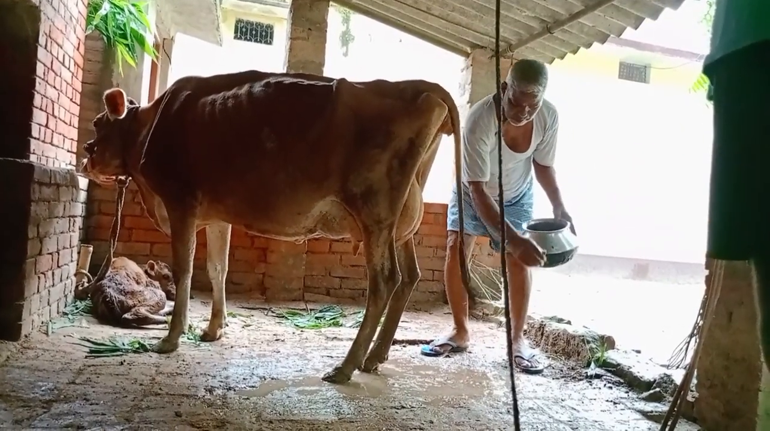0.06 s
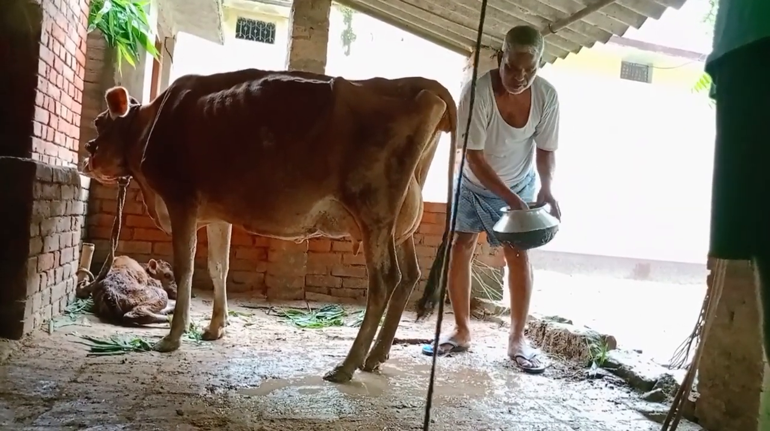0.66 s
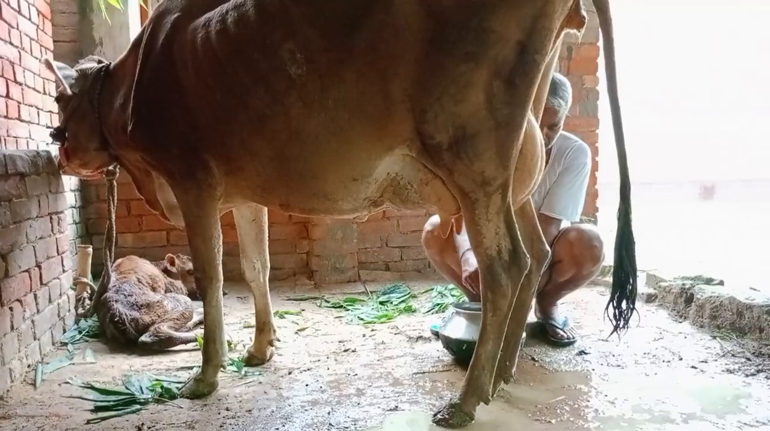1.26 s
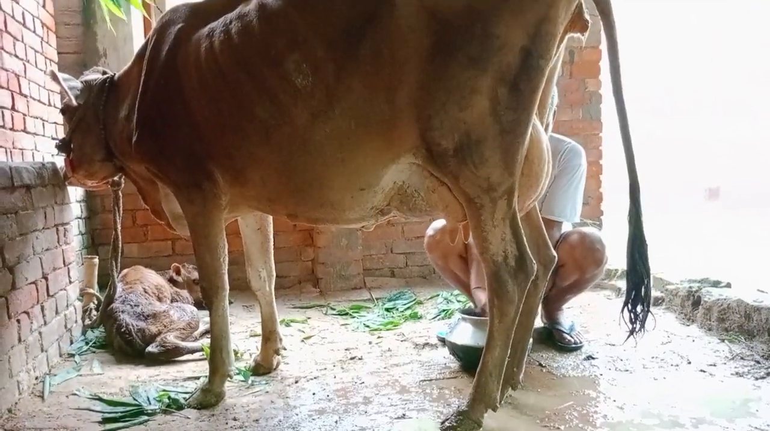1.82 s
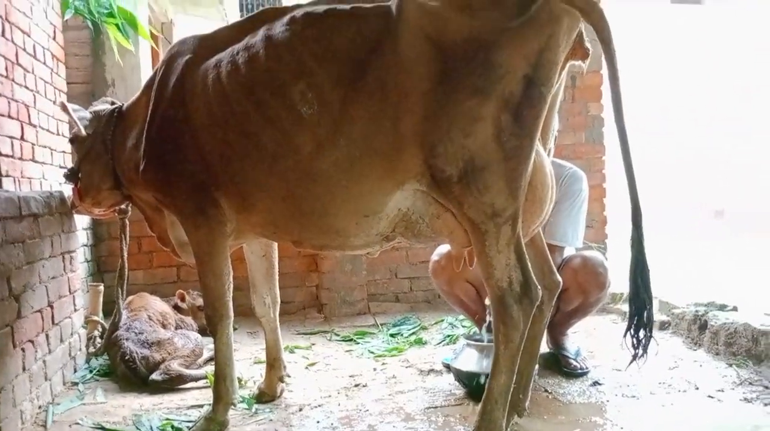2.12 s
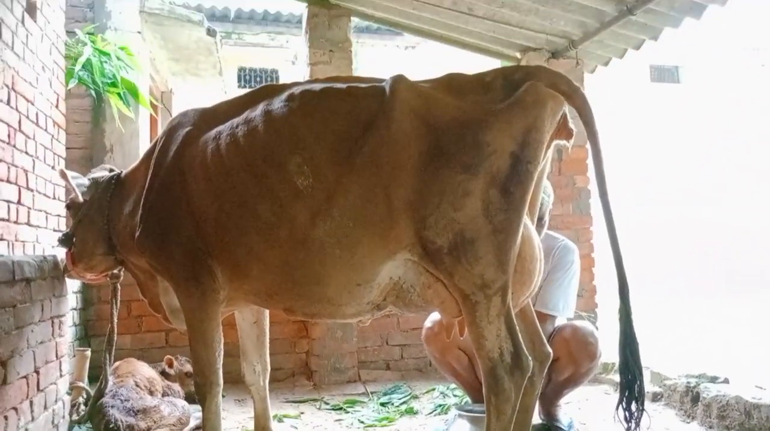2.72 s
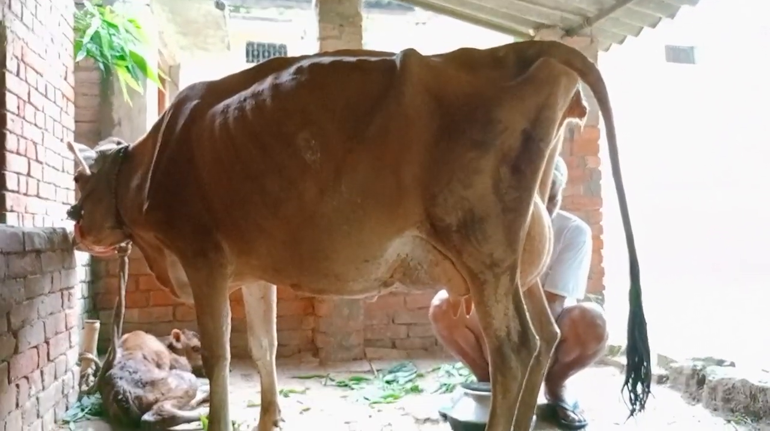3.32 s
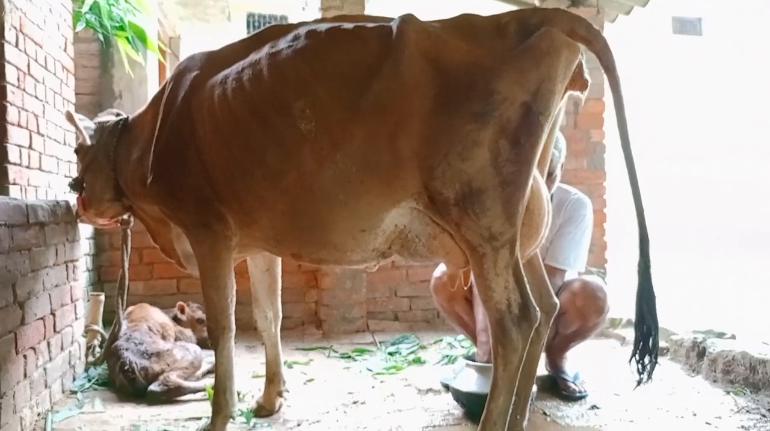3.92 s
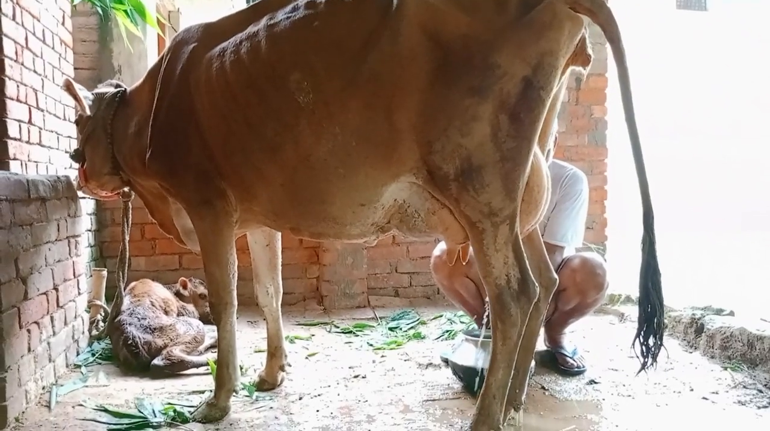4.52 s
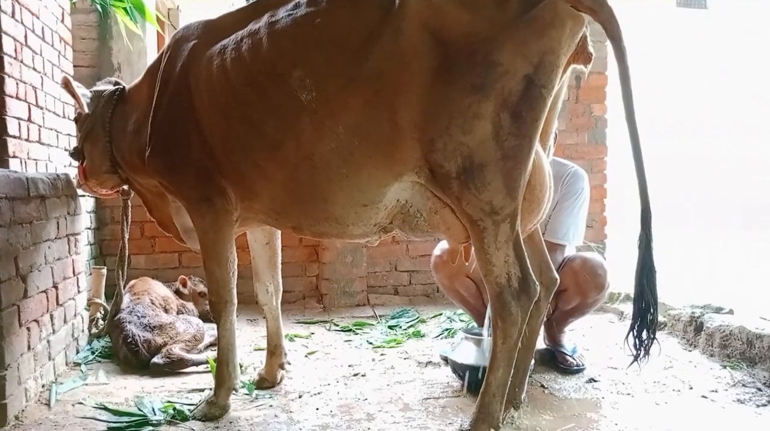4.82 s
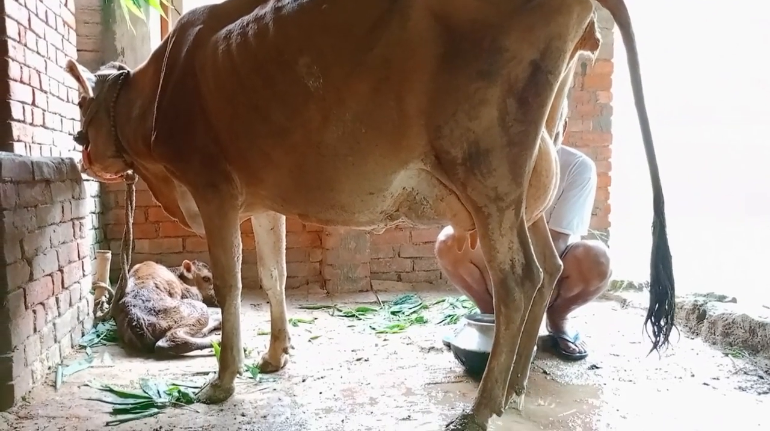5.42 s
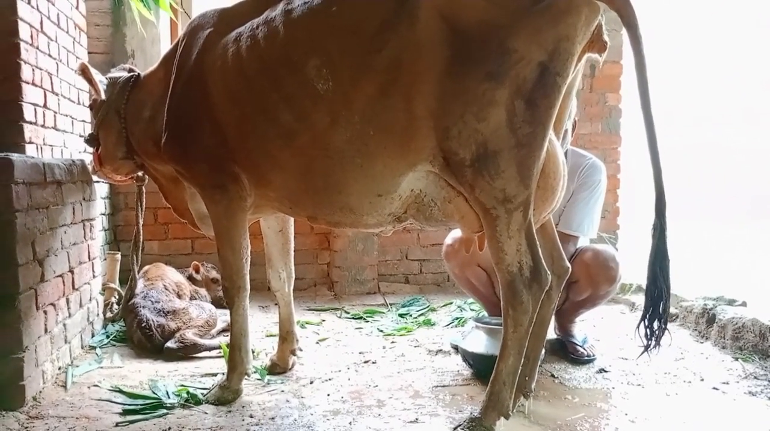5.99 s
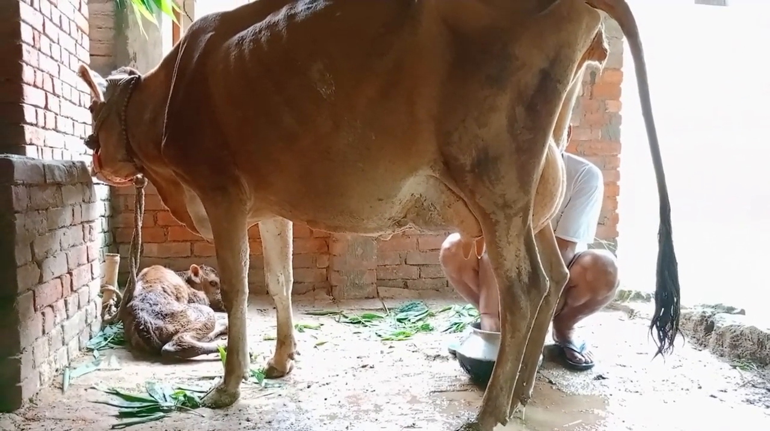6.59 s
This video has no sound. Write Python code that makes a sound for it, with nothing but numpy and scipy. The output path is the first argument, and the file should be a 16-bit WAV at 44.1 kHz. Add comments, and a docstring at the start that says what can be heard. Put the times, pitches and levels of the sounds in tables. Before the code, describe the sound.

In an open cowshed, short, uneven squirts of milk splash into a metal pot, with dribbles, ticking drips and a few sharp smacks of fat drops. A hoarse crow caw opens the scene and another comes near the end, as the milking grows sparser. Early on, everything drops to silence for under a second. Distant birds and a low rumble sit behind, heard through a slightly dull microphone.

```python
"""Over a low outdoor rumble a crow is already cawing, hoarse pulses ringing its throat; other birds
chirp and hoot far off. Within a second, hand milking of a cow starts in an open brick shed: short jets
spurt and splash into liquid, among drips, dribbles and a few soft knocks. At 1.2 s all sound drops out
for three quarters of a second. The milking carries on, some jets now ringing a metal pot and a few
fat drops smacking down. At 5 s the crow caws again, and the spurts thin out."""
import sys
import numpy as np
from scipy import signal
from scipy.fft import rfft, irfft, next_fast_len
from scipy.io import wavfile
from scipy.ndimage import map_coordinates

SR = 44100
rng = np.random.default_rng(int(sys.argv[2]) if len(sys.argv) > 2 else 0)


def master(y):
    """Save y as 16-bit WAV."""
    cut = np.clip(np.atleast_2d(y).T, -1, 1)
    pcm = np.round(cut * 32767)  # scale
    wavfile.write(sys.argv[1], SR, pcm.astype(np.int16))


N = 293385


def amp(db):
    return 10 ** (np.asarray(db) / 20)


def unit_rms(x):
    return x / np.sqrt(np.mean(x ** 2) + 1e-20)


def clock():
    return np.arange(N) / SR


def along(points, hz):
    """Read (Hz, value) points on a log frequency axis."""
    knots_hz, values = np.transpose(points)
    return np.interp(np.log(hz + 1), np.log(knots_hz + 1), values)


def fader(points):
    """A gain for every sample, from (seconds, dB) points."""
    return amp(np.interp(clock(), *np.transpose(points)))


def wobble(rate):
    """A smooth random curve, rate knots a second."""
    return map_coordinates(rng.standard_normal(int(N * rate / SR) + 4), [np.arange(N) * rate / SR])


def wavering_tone(hz, drift_hz, rate):
    """A sine whose pitch wanders at random around hz."""
    return np.sin(2 * np.pi * np.cumsum(hz + drift_hz * wobble(rate)) / SR)


def coloured(x, spectrum):
    """EQ x with a curve of (Hz, dB) points."""
    size = next_fast_len(len(x) + 8192)
    gain = amp(along(spectrum, np.fft.rfftfreq(size, 1 / SR)))
    return irfft(rfft(x, size) * gain, size)[:len(x)]


def resonate(x, hz, width_hz, order=2):
    """Ring x through a band-pass resonance."""
    edges = np.clip([hz - width_hz / 2, hz + width_hz / 2], 20, SR / 2 - 100)
    return signal.sosfilt(signal.butter(order, edges, "bandpass", fs=SR, output="sos"), x)


def add(track, start, x):
    """Mix x into the track from start seconds on."""
    part = track[max(round(start * SR), 0):][:len(x)]
    part += x[:len(part)]


def at_level(x, length, db):
    """Give x the energy of a sound held at db for length seconds."""
    return amp(db) * x * np.sqrt(length * SR / (np.sum(x ** 2) + 1e-20))


# Fader rides for the rumble and the hiss. Each row: time in seconds, level in dB.
RUMBLE_RIDE = [(0, -60.5), (2, -56.5), (5.2, -58), (5.5, -54.5), (6.65, -54)]
HISS_RIDE = [(0, -89), (1.2, -82), (1.97, -67.5), (6.65, -58.5)]
# Tone of the rumble and the airy hush. Each row: frequency in Hz, relative spectral level in dB.
RUMBLE_EQ = [(20, -51.5), (30, -20), (50, -14), (70, -3.5), (90, -4), (130, -1.5), (200, -2), (300, -10),
             (500, -28), (1500, -55.5)]
AIR_EQ = [(60, -32.5), (350, 5), (700, 2), (1500, 0.5), (2500, -3), (4000, -7.5), (5000, -9.5),
          (5700, -5.5), (7000, -8.5), (9000, -10), (16000, -11.5)]


def outdoors(air_db=-56, drone_db=-8, drone_hz=90):
    """The outdoor bed: a low rumble with a wavering drone in it, an even hush and a thin, rising hiss."""
    rumble = amp(1.6 * wobble(18)) * unit_rms(coloured(rng.standard_normal(N), RUMBLE_EQ))
    drone = amp(drone_db + 4.3 * wobble(6.5)) * unit_rms(wavering_tone(drone_hz, drift_hz=3, rate=11))
    air = amp(air_db + 0.93 * wobble(2.3)) * unit_rms(coloured(rng.standard_normal(N), AIR_EQ))
    hiss = unit_rms(resonate(rng.standard_normal(N), 13000, 12000, order=1))
    return fader(RUMBLE_RIDE) * (rumble + drone) + air + fader(HISS_RIDE) * hiss


def turbulence(hz):
    """Throat rasp: a rough band of noise around hz."""
    return unit_rms(wobble(680) * wavering_tone(hz, drift_hz=60, rate=200))


# The caws, the first already under way.
# Each row: start in seconds, length in seconds, gain in dB, extra rasp in dB.
CAWS = [(-.22, .41, -2, 6.5), (5.075, .425, 0, 1)]
# Throat resonances. Each row: pitch in Hz with the beak shut, then wide open, level in dB shut, then open.
THROAT = [(1439, 1935, -62, -47), (1983, 2510, -46, -53)]
BEAK_OPEN_S, BEAK_CLOSE_S = 0.055, 0.29
CAW_ATTACK_S, CAW_RELEASE_S, CAW_PULSE_HZ = 0.023, 0.16, 49.74
RASP_SHUT_DB, RASP_OPEN_DB = 4, -10  # noise against the pulses


def crow(jitter=0.12, scatter=0.016, uneven_db=0.5, overtone_db=-13.5, echo_db=-12, ring_s=0.0028):
    """Slow pulses ring two throat resonances that rise and sink with the beak; rasp fills the gaps."""
    out, now = np.zeros(N), clock()
    from_peak = np.arange(SR // 40) / SR - 3 * ring_s
    pulse_shape = np.exp(-0.5 * (from_peak / ring_s) ** 2)
    cycles = np.cumsum(CAW_PULSE_HZ * (1 + jitter * wobble(60))) // SR
    beats = np.flatnonzero(np.diff(cycles))
    for start, length, caw_db, hoarse_db in CAWS:
        since, left = now - start, start + length - now
        opening = np.clip(np.minimum(since / BEAK_OPEN_S, left / BEAK_CLOSE_S), 0, 1)
        effort = amp(caw_db) * np.clip(np.minimum(since / CAW_ATTACK_S, left / CAW_RELEASE_S), 0, 1)
        rasp = amp(hoarse_db + RASP_SHUT_DB + opening * (RASP_OPEN_DB - RASP_SHUT_DB))
        voice = np.zeros(N)
        for shut_hz, open_hz, shut_db, open_db in THROAT:
            hz = shut_hz + opening * (open_hz - shut_hz)
            db = shut_db + opening * (open_db - shut_db)
            voice += rasp * amp(db) * turbulence(hz)
            for i in beats[effort[beats] > 0]:
                ring_hz = hz[i] * (1 + scatter * rng.standard_normal())
                pulse_db = db[i] + uneven_db * rng.standard_normal()
                pulse = pulse_shape * np.sin(2 * np.pi * ring_hz * from_peak)
                add(voice, i / SR - 3 * ring_s, at_level(pulse, 1 / CAW_PULSE_HZ, pulse_db))
        voice += amp(db + overtone_db) * turbulence(4200)  # a faint overtone near the sum of the two resonances
        out += effort * voice / np.hypot(1, rasp)
    echo = np.pad(resonate(out, 2200, 900), (round(0.13 * SR), 0))[:N]  # slapback off a far wall
    return out + amp(echo_db) * echo


# High chirps and low hoots. Each row: start in seconds, length in seconds, pitch in Hz.
CHIRPS = [(.159, 0.22, 5520), (2.99, 0.12, 5570), (3.43, .073, 6500), (5.28, .1, 5860), (6, 0.094, 5550),
          (6.22, 0.075, 6500)]
HOOTS = [(.321, 0.1, 392), (.68, .09, 500), (3.009, .18, 417), (5.558, .15, 384)]


def far_birds(calls, width_hz, db):
    """Distant calls, blurred into soft swells of narrow noise."""
    out = np.zeros(N)
    for start, length, hz in calls:
        swell = np.hanning(round(length * SR)) ** 0.5
        band = resonate(rng.standard_normal(SR), hz, width_hz)[-len(swell):]
        add(out, start, amp(db) * swell * unit_rms(band))
    return out


def impacts(samples, rate, spread_db):
    """Droplets land at random, rate a second, in uneven sizes."""
    clicks = (rng.random(samples) < rate / SR) * rng.choice([-1, 1], samples)
    return clicks * amp(spread_db * rng.standard_normal(samples))


def jet(length, rate=3000, spread_db=3, release_s=0.0016):
    """A tightly gated burst of droplets, rate a second, over a little noise."""
    t = np.arange(SR // 4) / SR
    attack = 1 - np.exp(-t / (length * 0.029))
    release = np.exp(-np.maximum(t - length, 0) / min(release_s, length / 2))
    return attack * release * (impacts(len(t), rate, spread_db) + 0.13 * rng.standard_normal(len(t)))


# Spurts and splashes, with a few soft, low knocks. Each row: start in seconds, length in seconds,
# pitch of the hollow in Hz, its level in dB, pitch of the spray in Hz, its level in dB.
SPURTS = [(0.476, 0.0099, 445, -52, 900, -72), (.526, 0.019, 3070, -70, 5800, -58),
          (0.874, 0.039, 3800, -75, 6400, -59.5), (.992, .022, 1440, -45, 6500, -47.5),
          (1.009, .024, 1590, -45, 4430, -45.5), (1.2002, 0.0067, 1065, -37, 4430, -36.5),
          (2.044, 0.0071, 2040, -44, 3770, -59.5), (2.052, .023, 2050, -49, 3830, -53.5),
          (2.08, 0.024, 1400, -49, 2030, -50.5), (2.127, 0.062, 1720, -56, 4070, -66.5),
          (2.265, 0.049, 1900, -55.5, 3060, -52.5), (2.3, .016, 1330, -49, 5500, -52.5),
          (2.318, 0.0151, 1130, -40.5, 1800, -45), (2.364, .029, 496, -47.5, 2560, -49.5),
          (2.386, 0.051, 383, -53, 1430, -55.5), (2.486, 0.013, 3460, -52, 6200, -53),
          (2.523, 0.01, 1680, -45.5, 3630, -40.5), (2.541, 0.044, 3420, -56.5, 6700, -55),
          (2.673, 0.029, 1690, -59, 3480, -53), (2.909, 0.015, 3550, -55, 5550, -62),
          (3.652, .02, 1190, -57, 6530, -65), (4.038, 0.01, 3020, -75, 4570, -52.5),
          (4.37, 0.042, 423, -59, 900, -58.5), (4.4828, .015, 1970, -44, 3190, -38.5),
          (4.499, .019, 1940, -47.5, 3200, -42), (4.648, 0.048, 3180, -60, 4140, -56),
          (4.775, 0.021, 2050, -50.5, 7200, -55.5), (4.793, 0.026, 1500, -48.5, 1970, -57),
          (4.816, 0.036, 860, -55, 1450, -68), (4.874, 0.029, 1510, -54, 2560, -54),
          (4.958, .01, 4090, -62, 7390, -41.5), (5.012, 0.03, 3950, -49.5, 5200, -51.5),
          (5.286, .041, 5670, -60, 7040, -57.5), (5.66, .012, 3500, -75, 7400, -54),
          (5.849, .016, 1400, -55, 6100, -60.5), (6.437, .082, 660, -61, 3250, -68)]
MIST_RATIO, MIST_DB = 2.1, -13  # the spray's weaker upper resonance
FIZZ_DB, FIZZ_DB_PER_OCTAVE = -3, 7.5  # fizz against a spray at 5 kHz; finer spray fizzes more


def spurts(hollow_width=0.15, spray_width=0.2):
    """A jet rings the air pocket it digs in the liquid and throws up fizzing spray; knocks use it too."""
    out = np.zeros(N)
    for start, length, hollow_hz, hollow_db, spray_hz, spray_db in SPURTS:
        drive = jet(length)
        mist_hz, mist_db = MIST_RATIO * spray_hz, spray_db + MIST_DB
        fizz_db = spray_db + FIZZ_DB + FIZZ_DB_PER_OCTAVE * np.log2(spray_hz / 5000)
        hollow = resonate(drive, hollow_hz, hollow_width * hollow_hz + 60)
        spray = resonate(drive, spray_hz, spray_width * spray_hz)
        mist = resonate(drive, mist_hz, spray_width * mist_hz)
        fizz = resonate(jet(length, rate=1400, spread_db=-3.5), 12500, 15000, order=1)
        for layer, db in (hollow, hollow_db), (spray, spray_db), (mist, mist_db), (fizz, fizz_db):
            add(out, start, at_level(layer, length, db))
    return out


# The clearest drips. Each row: start in seconds, level in dB before the trim.
DRIPS = [(.873, -37), (1.01, -42.5), (2.13, -45), (2.445, -32.5), (2.558, -35), (2.612, -27), (2.762, -42),
         (2.845, -40.5), (2.917, -30), (3.316, -43), (3.659, -41), (3.985, -50), (4.72, -39),
         (5.012, -32.5), (5.06, -34.5), (6.25, -48), (6.308, -44)]
STRAY_SPAN_S, STRAY_DB, STRAY_SPREAD_DB = (1.8, 6.6), -52.5, 1


def drips(t60=0.1, trim_db=-5, stray_count=22):
    """Single drips tick brightly: a few clear ones, and many faint strays at random."""
    out, t = np.zeros(N), np.arange(SR // 10) / SR
    stray_starts = rng.uniform(*STRAY_SPAN_S, stray_count)
    stray_levels = STRAY_DB + STRAY_SPREAD_DB * rng.standard_normal(stray_count)
    for start, db in [*DRIPS, *zip(stray_starts, stray_levels)]:
        tick = unit_rms(resonate(rng.standard_normal(len(t)), 13000, 8400, order=1))
        add(out, start, amp(db + trim_db - 60 * t / t60) * tick)
    return out


def bout(start, end, rise_s=0.04, settle_s=0.11):
    """The envelope of a dribble: it builds quickly, holds from start to end and settles slowly."""
    t = clock()
    return np.exp(-np.maximum(start - t, 0) / rise_s - np.maximum(t - end, 0) / settle_s)


# Bouts of dribbling. Each row: start in seconds, hold in seconds, level in dB.
DRIBBLES = [(.9, .1, -59), (1.987, 0.2, -55), (2.279, .3, -52), (4.03, 0.061, -58), (4.612, 0.84, -57.5),
            (4.79, 0.064, -50), (6.473, .2, -61.5)]
# Tone of the droplet patter. Each row: frequency in Hz, relative gain in dB.
PATTER_EQ = [(200, -34.5), (600, -8.5), (1400, -5), (2200, -4.5), (3500, -8.5), (5000, -13.5), (7000, -9),
             (16000, -9.5)]
TRICKLE_SPAN_S, TRICKLE_DB = (1.5, 5.55), -61  # a faint patter under most of the milking


def dribble(sputter_db=2):
    """Loose droplets of many sizes patter on between the spurts, each size at its own pitch."""
    flows = [amp(db) * bout(start, start + length) for start, length, db in DRIBBLES]
    flows.append(amp(TRICKLE_DB) * bout(*TRICKLE_SPAN_S))
    pitches_hz = np.geomspace(400, 14000, 12)
    patter = sum(resonate(impacts(N, rate=450, spread_db=3.5), hz, hz / 3) for hz in pitches_hz)
    sputter = amp(sputter_db * wobble(30))
    return np.linalg.norm(flows, axis=0) * sputter * unit_rms(coloured(patter, PATTER_EQ))


# The metal pot's modes. Each row: pitch in Hz, relative level in dB, seconds to fade by 60 dB.
POT_MODES = [(562.7, 6, 0.31), (737, 4, 0.14), (919, 0.5, 0.61), (1438, -4.5, 0.6), (1566, -2, .35),
             (1590, 4, 0.12), (1920, 2, 0.3), (2470, -11, .5)]
# The jet meets the pot.
# Each row: start in seconds, build-up in seconds, drive in dB, frequency it rings most in Hz.
POT_HITS = [(2.318, 0.042, -49, 1690), (2.368, 0.028, -55, 580), (2.416, 0.0088, -56.5, 1100),
            (2.855, 0.027, -61.5, 1550), (4.719, 0.017, -61.5, 940), (4.817, .021, -51, 1000),
            (4.899, .027, -61, 1450)]


def pot(reach_octaves=0.46, sway_db=4, sway_hz=11):
    """Where the jet lands decides which modes speak; they ring on with a slow, beating waver."""
    out, t = np.zeros(N), np.arange(SR) / SR
    for start, build_s, hit_db, centre_hz in POT_HITS:
        attack = 1 - np.exp(-2 * t / build_s)
        for hz, mode_db, t60 in POT_MODES:
            coupling = 2 * np.exp(-(np.log2(hz / centre_hz) / reach_octaves) ** 2)
            sway = sway_db * np.sin(2 * np.pi * (sway_hz * t + rng.random()))
            decay = amp(hit_db + mode_db + sway - 60 * t / t60)
            tone = np.sin(2 * np.pi * (hz * t + rng.random()))
            add(out, start, coupling * attack * decay * tone)
    return out


# Fat drops landing. Each row: start in seconds, level in dB before the body and splash trims.
SMACKS = [(2.5626, -34.5), (2.6097, -29), (2.7601, -30), (5.001, -32)]


def smacks(length=0.0023, body_db=-7, splash_db=-13):
    """Each fat drop lands with a sharp smack: a bright body with a splash on top."""
    out = np.zeros(N)
    for start, db in SMACKS:
        drive = jet(length)
        add(out, start, at_level(resonate(drive, hz=3960, width_hz=1100), length, db + body_db))
        add(out, start, at_level(resonate(drive, hz=6500, width_hz=4000), length, db + splash_db))
    return out


# The shed's reverb. Each row: frequency in Hz, seconds to fade by 60 dB.
SHED_DECAY = [(200, 0.091), (2000, 0.22), (5000, 0.23), (12000, 0.035)]


def shed(x, predelay_s=0.006):
    """Brick walls and roof answer with a short tail, the treble dying first."""
    hz, t, noise = signal.stft(rng.standard_normal(SR // 2), SR, nperseg=256)
    decay = amp(-60 * t / along(SHED_DECAY, hz)[:, None])
    _, tail = signal.istft(noise * decay, SR, nperseg=256)
    response = np.pad(tail, (round(predelay_s * SR), 0)) / np.linalg.norm(tail)
    return signal.fftconvolve(x, response)[:N]


def scene():
    """The mono mix: milking and birds each feed the shed's reverb, over the outdoor bed."""
    milking = spurts() + smacks() + dribble() + drips() + pot()
    birds = amp(-1) * crow()
    birds += far_birds(CHIRPS, width_hz=690, db=-64)
    birds += far_birds(HOOTS, width_hz=41, db=-61)
    birds += amp(-4) * shed(birds)
    milking += amp(-7) * shed(milking)
    return (milking + birds + outdoors())[None]


# The microphone's dull treble. Each row: frequency in Hz, gain in dB.
MICROPHONE_EQ = [(7000, 0.5), (8000, -9), (9500, -16.5), (11000, -28), (13600, -27), (15000, -17.5)]
DROPOUT_FROM_S, DROPOUT_TO_S, HIGH_CUT_HZ = 1.2082, 1.967, 15800


def record(dry):
    """A dull microphone, a hard mute for the dropout, then a brick-wall high cut."""
    t = clock()
    gate = (t < DROPOUT_FROM_S) | (t > DROPOUT_TO_S)
    heard = coloured(dry[0], MICROPHONE_EQ) * gate
    size = next_fast_len(N + 8192)
    passband = np.fft.rfftfreq(size, 1 / SR) < HIGH_CUT_HZ
    return irfft(rfft(heard, size) * passband, size)[None, :N]


dry = scene()
out = record(dry)
master(out)
```